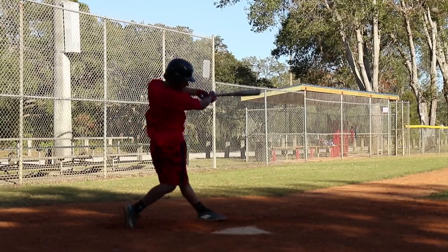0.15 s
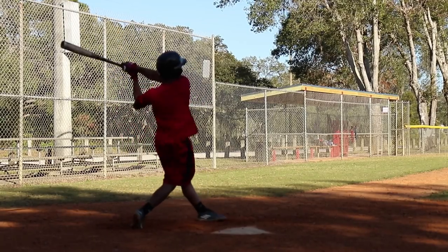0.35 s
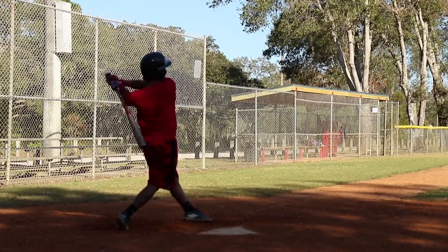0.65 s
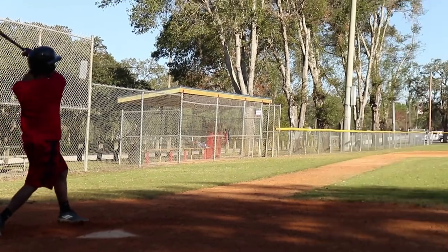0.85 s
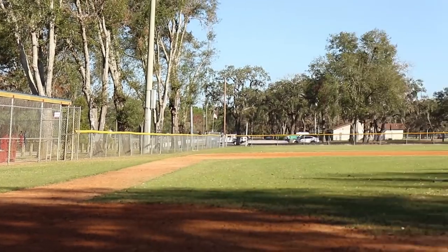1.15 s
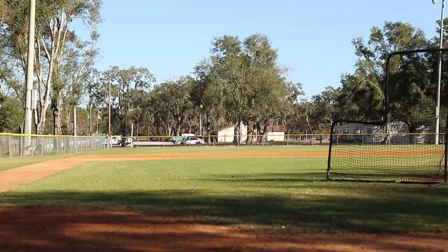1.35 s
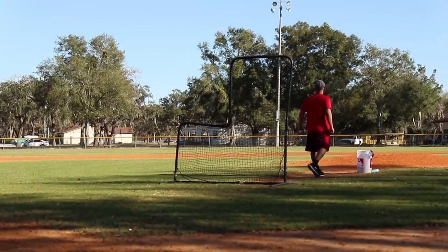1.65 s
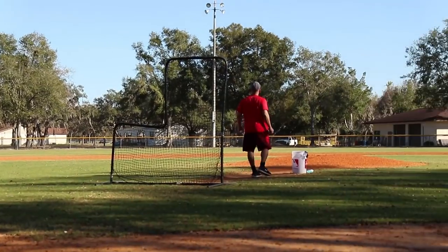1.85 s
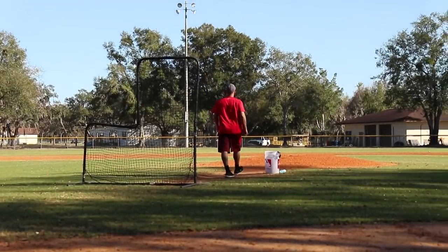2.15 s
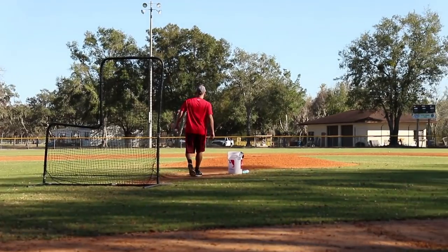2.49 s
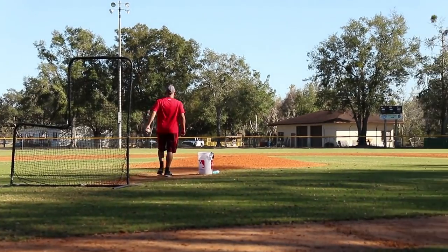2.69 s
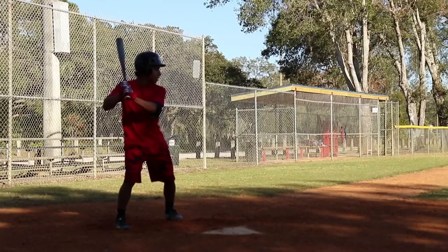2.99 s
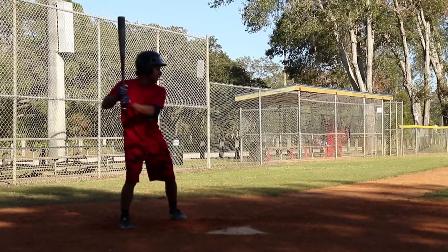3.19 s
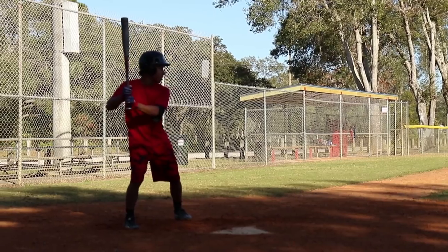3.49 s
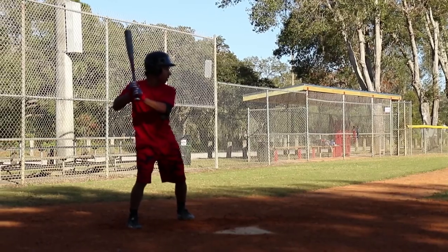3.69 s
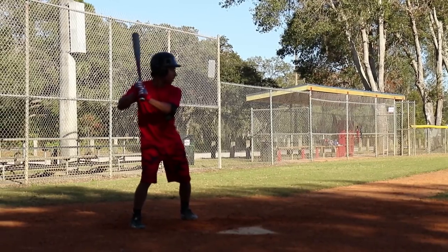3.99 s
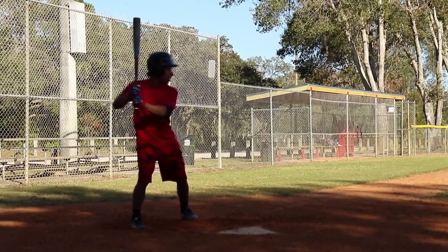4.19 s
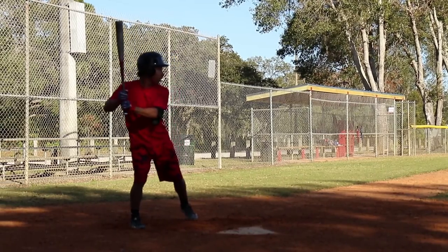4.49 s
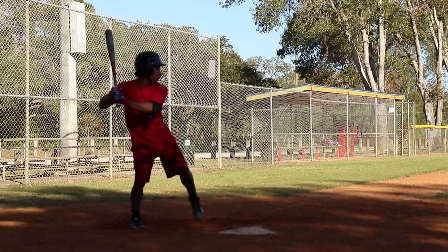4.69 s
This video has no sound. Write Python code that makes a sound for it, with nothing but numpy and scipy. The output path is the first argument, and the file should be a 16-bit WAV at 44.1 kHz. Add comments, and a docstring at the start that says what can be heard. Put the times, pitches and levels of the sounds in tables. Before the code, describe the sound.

A metal bat cracks loudly against a baseball, rings and echoes across an open field, then wind, dirt scuffs and faint crow caws follow.

```python
"""Bat and ball on an open field

A metal bat strikes a ball: an overloading crack of short rings, then the barrel's longer ping, thrown back
by near surfaces and by scattered fences and trees as noisy, dulling echoes.
Wind buffets the microphone as lumpy low noise over a steady bed of far traffic; grains of noise make shoes
on dirt, throbbing harmonics a crow, and short sine glides small birds far away.
The recorder's gain control ducks after the blow and recovers."""
import sys
import numpy as np
from scipy import signal
from scipy.fft import rfft, irfft
from scipy.io import wavfile
from scipy.ndimage import minimum_filter1d

SR = 44100
rng = np.random.default_rng(int(sys.argv[2]) if len(sys.argv) > 2 else 0)


def elevation(decibels):
    """Turn decibel levels (scalar or array-like) into linear amplitude ratios."""
    levels = np.asarray(decibels, float)
    return 10 ** (levels / 20)


def master_out(mix):
    """Clip the mix to full scale and print it as 16-bit PCM to the path in sys.argv[1]."""
    frames = np.transpose(np.atleast_2d(mix))
    ceiling = np.clip(frames, -1, 1)
    pcm = np.round(ceiling * 32767).astype(np.int16)
    wavfile.write(sys.argv[1], SR, pcm)


N = 213664   # samples


def rms_one(x):
    """Scale to unit rms."""
    return x / np.sqrt(np.mean(x ** 2) + 1e-20)


def coloured(spectrum):
    """Noise of rms 1 whose spectrum runs through the given points, straight over log frequency."""
    hz = np.maximum(np.fft.rfftfreq(N, 1 / SR), 1)
    point_hz, point_db = np.transpose(spectrum)
    shape_db = np.interp(np.log(hz), np.log(point_hz), point_db)
    return rms_one(irfft(rfft(rng.standard_normal(N)) * elevation(shape_db), N))


def drift(rate_hz):
    """Slow random wander of rms 1: noise through two equal low-pass poles."""
    r = np.exp(-2 * np.pi * rate_hz / SR)
    settled = signal.lfilter([1], [1, -2 * r, r * r], rng.standard_normal(N + SR))[SR:]
    return rms_one(settled)


def ring(clicks, hz, t60):
    """A unit click sets a decaying sine of starting height 1 ringing."""
    r = elevation(-60 / (t60 * SR))
    w = 2 * np.pi * hz / SR
    return signal.lfilter([0, np.sin(w)], [1, -2 * r * np.cos(w), r * r], clicks + 1e-18)


def resonate(x, peaks):
    """Parallel resonances with alternating signs; rms 1."""
    out = np.zeros(N)
    for k, (hz, width_hz, db) in enumerate(peaks):
        t60 = np.log(1000) / (np.pi * width_hz)
        out += (-1) ** k * elevation(db) * np.sqrt(width_hz) * ring(x, hz, t60)
    return rms_one(out)


def swell_db(peak_s, rise_s, fall_s, db):
    """A level that climbs to its peak and sinks again, 20 dB over rise_s and over fall_s."""
    t = np.arange(N) / SR - peak_s
    return db - 20 * np.maximum(-t / rise_s, t / fall_s)


def power_sum(levels_db):
    """Height of unrelated sounds heard together."""
    return np.sqrt(sum(elevation(db) ** 2 for db in levels_db))


# Spectrum of far traffic and the hiss of air and microphone: f/Hz, relative level/dB
FIELD_SPECTRUM = [(180, -35), (300, -3), (391, -15), (546, -11), (712, -12.5), (774, -11.5), (870, -12),
                  (961, -11), (1810, -17), (2130, -22), (3290, -25), (4820, -30), (11500, -30),
                  (16000, -37.5)]


def field():
    """Far traffic, air and microphone hiss: one coloured noise whose level wanders slightly."""
    return elevation(-54 + 0.38 * drift(2.8)) * coloured(FIELD_SPECTRUM)


# Buffeting at the microphone: t/s, level/dB
WIND_LEVEL = [(0.0, -47), (0.045, -37), (0.13, -35), (0.46, -39.5), (0.644, -43), (0.75, -37),
              (0.845, -30.5), (0.89, -39.5), (0.986, -45), (1.1, -45), (1.2, -44.5), (1.66, -42),
              (2.08, -44), (2.88, -40), (2.99, -44), (3.03, -48), (4.0, -47), (4.6, -49), (4.84, -49)]
# Low noise at the microphone, early and late: f/Hz, relative level/dB
EARLY_WIND_SPECTRUM = [(15, -54), (25, -13.5), (75, -1.5), (107, 1.5), (141, 0), (188, -1.5), (264, -6),
                       (352, -24), (500, -30), (650, -55), (1100, -120)]
LATE_WIND_SPECTRUM = [(15, -41), (25, -16), (59, -5.5), (114, 1), (172, -7), (242, -7), (264, -16),
                      (425, -30), (500, -45), (650, -46), (1100, -120)]
# Slow swells of the deep rumble: peak t/s, rise/s and fall/s (20 dB each), level/dB
RUMBLE_SWELLS = [(0.0, .01, 0.11, -33), (.47, 0.36, 0.26, -37.5), (.9, .5, 0.35, -37.5),
                 (1.25, .2, 0.57, -50), (3.99, 0.9, 0.21, -46), (4.74, 0.21, .4, -45)]


def wind():
    """Lumpy low noise: buffeting follows the wind, deep rumble follows it too and has slow swells of its own."""
    late_from_s, deep_under_db = 3.0, 13   # the late spectrum replaces the early one at once
    t = np.arange(N) / SR
    rumble = np.where(t > late_from_s, coloured(LATE_WIND_SPECTRUM), coloured(EARLY_WIND_SPECTRUM))
    below_90 = signal.butter(2, 90, "low", fs=SR, output="sos")
    above_90 = signal.butter(2, 90, "high", fs=SR, output="sos")
    deep = rms_one(signal.sosfiltfilt(below_90, rumble))
    buffet = rms_one(signal.sosfiltfilt(above_90, rumble))
    point_s, point_db = np.transpose(WIND_LEVEL)
    wind_db = np.interp(t, point_s, point_db)
    deep_height = power_sum([wind_db - deep_under_db] + [swell_db(*swell) for swell in RUMBLE_SWELLS])
    low = buffet * elevation(wind_db + 1.0 * drift(19.0))
    low += deep * deep_height * elevation(1.33 * drift(9.3))
    # strong gusts bend the diaphragm unevenly
    pop_band = signal.butter(2, [260, 520], "band", fs=SR, output="sos")
    pops = signal.sosfilt(pop_band, low * np.abs(low))
    return low + elevation(22.5) * pops


# Small birds far away: start t/s, length/s, start f/Hz, end f/Hz, peak level/dB
BIRD_CHIRPS = [(.485, .03, 9000, 6960, -66), (1.617, 0.027, 10880, 13300, -58),
               (1.768, .035, 6400, 6130, -65), (1.912, 0.015, 12600, 10900, -59),
               (2.283, .009, 11500, 14800, -55), (2.878, .012, 11000, 10000, -61)]


def birds():
    """Quick whistled glides, each a sine sliding in pitch, with a close echo."""
    out = np.zeros(N)
    for s, length_s, start_hz, end_hz, db in BIRD_CHIRPS:
        hz = np.linspace(start_hz, end_hz, round(length_s * SR))
        whistle = np.sin(2 * np.pi * np.cumsum(hz) / SR)
        at = round(s * SR)
        out[at:at + len(hz)] += elevation(db) * np.sqrt(np.hanning(len(hz))) * whistle
    return out + elevation(-8) * np.roll(out, round(.009 * SR))


# Crow calls: start t/s, length/s, top f/Hz of the strong second harmonic, level/dB before the harmonics' own
CROW_CALLS = [(2.11, 0.18, 1500, -60), (2.477, 0.18, 1515, -61.5), (3.27, .165, 1545, -56),
              (3.652, 0.18, 1545, -55.5), (3.769, .095, 1780, -58.5)]
# Harmonics of a call: multiple of the fundamental, relative level/dB
CROW_HARMONICS = [(1, -17), (2, 0.5), (3, -13), (4, -18)]


def crow(rough_db, waver):
    """Arched harmonic calls, throbbing with the rasp of the throat, and a faint echo."""
    top_at, start_pitch, end_pitch = .31, 0.74, .76   # share of the length; shares of the top pitch
    edge_s, sink_db = 0.033, 5   # fade at both ends; each call starts this much louder than it ends
    throat_hz, throat_width_hz, throat_db = 1302, 166, 7   # lifts the harmonic that passes through it
    out, t = np.zeros(N), np.arange(N) / SR
    for s, length_s, top_hz, db in CROW_CALLS:
        gone = np.clip((t - s) / length_s, 0, 1)
        rising = np.maximum(1 - gone / top_at, 0) ** 2
        sagging = np.maximum((gone - top_at) / (1 - top_at), 0) ** 1.5
        hz = top_hz * (1 - (1 - start_pitch) * rising - (1 - end_pitch) * sagging)
        # pi, not 2 pi: the fundamental lies at half of hz
        phase = np.pi * np.cumsum(hz * (1 + waver * drift(56.6))) / SR
        stack = np.zeros(N)
        for k, level_db in CROW_HARMONICS:
            lift_db = throat_db * np.exp(-((k * hz / 2 - throat_hz) / throat_width_hz) ** 2)
            stack += elevation(level_db + lift_db) * np.sin(k * phase)
        edges = np.clip(np.minimum(t - s, s + length_s - t) / edge_s, 0, 1)
        call_db = db + sink_db * (1 - gone) + rough_db * drift(90.4)
        out += np.sqrt(2) * stack * edges * elevation(call_db)
    return out + elevation(-16) * np.roll(out, round(.045 * SR))


# Small knocks and clinks nearby: t/s, main ring level/dB, main f/Hz, second f/Hz, t60/s
SMALL_KNOCKS = [(2.464, -41, 1090, 691, 0.078), (2.505, -46.5, 3330, 4520, .011),
                (2.953, -52.5, 1820, 3440, .17), (3.309, -41.5, 2530, 1785, .07),
                (3.312, -52, 3000, 3150, .12)]


def small_knocks():
    """Each knock sets two rings going, the second 5.5 dB weaker."""
    out = np.zeros(N)
    for s, db, main_hz, second_hz, t60 in SMALL_KNOCKS:
        click = np.zeros(N)
        click[round(s * SR)] = elevation(db)
        out += ring(click, main_hz, t60) + elevation(-5.5) * ring(click, second_hz, t60)
    return out


# Grit ticks as a shoe settles: t/s, level/dB before the modes' own
GRIT_TICKS = [(.987, -47), (1.004, -40), (1.019, -42), (3.322, -56), (3.363, -43), (3.374, -44),
              (3.41, -49), (3.444, -44.5), (3.522, -53), (4.47, -55.5)]
# What every tick rings with: f/Hz, relative level/dB, t60/s
GRIT_TICK_MODES = [(1500, 2, 0.011), (3200, -4, 0.011), (3900, -6, .008), (4900, -7, 0.011),
                   (5960, -5, .006), (7100, -11, .005), (8800, -13, .004)]


def grit_ticks():
    """Every tick strikes the same short modes."""
    ticks = np.zeros(N)
    for s, db in GRIT_TICKS:
        ticks[round(s * SR)] = elevation(db)
    return sum(elevation(db) * ring(ticks, hz, t60) for hz, db, t60 in GRIT_TICK_MODES)


# Resonances of the rubbing sole: f/Hz, width f/Hz, relative level/dB in each of two passes
SOLE_RESONANCES = [(925, 250, -3), (2180, 180, -1), (2820, 160, -2.5), (3220, 160, -3), (4170, 200, -3.5),
                   (5280, 200, -6.5), (6220, 220, -6.5), (7500, 350, -7)]


def sole_squeak(grains, grit):
    """A sole rubs as the batter twists: rubbing noise rings twice through the sole, then fades."""
    hold_s, fade_s, level_db = .056, 0.041, -45.5   # the fade spans 20 dB
    rubbed = resonate(grains, SOLE_RESONANCES) + .3 * grit
    steady_then_fade_db = swell_db(hold_s, 1e3, fade_s, level_db)
    return elevation(steady_then_fade_db) * resonate(rubbed, SOLE_RESONANCES)


# Shoes on dirt: peak t/s, rise/s and fall/s (20 dB each), grit level/dB, dullness 0-1 (adds dirt)
SHOE_SCUFFS = [(0.132, 0.18, 0.036, -54.5, 1), (.736, .14, 0.18, -48.5, 0.34), (1.02, 0.11, .05, -48, 0.99),
               (2.98, .2, .1, -66, 0.53), (3.325, .035, .5, -53, 0.46), (4.47, .03, 0.046, -64, .5),
               (4.545, .14, 0.039, -61.5, 0.47)]
# Resonances of bright grit and of duller dirt: f/Hz, width f/Hz, relative level/dB
GRIT_RESONANCES = [(2550, 2100, 1.5), (4150, 2700, -2), (5418, 900, -6.5), (6700, 1200, -10),
                   (9000, 4200, -14)]
DIRT_RESONANCES = [(900, 600, 0.5), (1599, 1100, 3), (2210, 790, -12.5)]


def shoes():
    """Dense uneven grains ring in grit and in duller dirt, and feed the rubbing sole."""
    struck = rng.random(N) < 3000 / SR   # about 3000 grains per second
    grain_db = 4.0 * np.minimum(rng.exponential(1, N), 4)
    grains = struck * elevation(grain_db) * rng.choice([-1, 1], N)
    grit = resonate(grains, GRIT_RESONANCES)
    dirt = resonate(grains, DIRT_RESONANCES)
    out = sole_squeak(grains, grit)
    for peak_s, rise_s, fall_s, db, dull in SHOE_SCUFFS:
        scuff_db = swell_db(peak_s, rise_s, fall_s, db) + 1.3 * drift(40)
        out += elevation(scuff_db) * (grit + 2 * np.clip(dull, 0, 1) * dirt)
    return out


# Echo clouds off fences and trees: arrival t/s after the blow, hold/s, relative level/dB, t60/s
SCATTERED_ECHOES = [(0.0038, .002, -10.5, .04), (.024, 0.0089, -15, 0.11), (.04, 0.11, -26, 0.3),
                    (.02, 0.22, -51.5, 2.15)]


def echo_height():
    """Scattered echoes build up quickly, hold and die away, their sum flickering in level."""
    t = np.arange(N) / SR
    levels_db = []
    for s, hold_s, db, t60 in SCATTERED_ECHOES:
        decay_db = 60 * np.maximum(t - s - hold_s, 0) / t60
        levels_db.append(swell_db(s, 0.019, 1002.0, db) - decay_db)
    return power_sum(levels_db) * elevation(2.0 * drift(25))


# Near reflections of the ping: delay t/s, level/dB against the direct sound
NEAR_REFLECTIONS = [(0.0104, 6), (.04, -3.5), (0.116, -14), (.16, -16), (0.207, -29)]


def echo_paths(echoes):
    """The ping's paths to the microphone: direct, near reflections and a haze of random taps."""
    paths = np.zeros(N)
    paths[0] = 1
    for delay_s, db in NEAR_REFLECTIONS:
        paths[round(delay_s * SR)] = elevation(db)
    return paths + elevation(-26) * echoes * rng.standard_normal(N)


# The crack as it returns from all round: f/Hz, relative level/dB
WASH_SPECTRUM = [(260, -58.5), (450, -25.5), (691, -14.5), (1020, -13.5), (1410, -6.5), (2330, -15),
                 (3040, -8.5), (3530, -20.5), (10700, -40), (15500, -52.5)]


def crack_wash(echoes):
    """The returning crack as coloured noise; air takes the treble off the far, later paths."""
    t = np.arange(N) / SR
    wash = elevation(9.5) * echoes * coloured(WASH_SPECTRUM)
    bright = signal.sosfilt(signal.butter(2, 4000, "high", fs=SR, output="sos"), wash)
    return wash - bright * (1 - elevation(5.5 - 38 * t))


# Narrow tones in the far echoes: f/Hz, width f/Hz, relative level/dB in each of two passes
LINGERING_TONES = [(1340, 50, 1), (1450, 55, 0.5), (2510, 32, -2), (2730, 25, -3.5), (3015, 26, -0.5),
                   (3310, 30, 1.5)]


def lingering_echoes():
    """Noise narrowed twice by the same resonances lingers in the far echoes."""
    rise_s, t60, level_db = 0.16, 1.46, -35   # the rise spans 20 dB and ends at the peak
    tones = resonate(resonate(rng.standard_normal(N), LINGERING_TONES), LINGERING_TONES)
    return tones * elevation(swell_db(rise_s, rise_s, t60 / 3, level_db))


# Short knock of ball on barrel: f/Hz, level/dB against the blow, t60/s
BALL_KNOCK = [(670, -14.5, 0.024), (1102, -5.5, 0.016), (1233, 1.5, 0.017), (1505, -6, .02),
              (2260, -5.5, 0.014), (2836, -4.5, 0.014), (3650, -8.5, 0.012), (5650, -16, .008),
              (6945, -21, 0.0068), (10000, -20, .005)]
# Ringing barrel: f/Hz, level/dB against the blow, t60/s
BARREL_MODES = [(1350, -24, .1), (2490, -18.5, .15), (2526, -16.5, .1), (2980, -9.5, 0.09),
                (3013, -20.5, .1), (3262, -29, 0.18), (3770, -29.5, .05), (5630, -38, 0.083),
                (7460, -33.5, 0.14)]


def bat():
    """One click rings the knock and the barrel; near surfaces and a dulling haze of echoes answer."""
    hit_s, hit_db = .1469, 14
    t, click = np.arange(N) / SR, np.zeros(N)
    click[0] = elevation(hit_db)
    knock = sum(elevation(db) * ring(click, hz, t60) for hz, db, t60 in BALL_KNOCK)
    # the swinging barrel turns each mode towards and away from the listener
    ping = sum(elevation(db + 3.0 * drift(10)) * ring(click, hz, t60) for hz, db, t60 in BARREL_MODES)
    ping *= 1 - np.exp(-t / 0.0057)   # soft onset
    echoes = echo_height()
    heard = knock + signal.fftconvolve(ping, echo_paths(echoes))[:N]
    heard += crack_wash(echoes) + lingering_echoes()
    start = round(hit_s * SR)
    return np.concatenate([np.zeros(start), heard[:N - start]])


def scene():
    """Everything the microphone hears, as one channel."""
    background = field() + wind() + birds() + crow(rough_db=4.2, waver=.025)
    nearby = small_knocks() + grit_ticks() + shoes()
    return (background + nearby + bat())[None]


def gain_control(x, threshold_db, hold_s, release_db_s, attack_s):
    """Peaks over the threshold pull the gain down; it holds, then climbs back."""
    over_db = np.maximum(20 * np.log10(np.abs(x) + 1e-9) - threshold_db, 0)
    size = round(hold_s * SR)
    # the origin makes the window look back only
    held = -minimum_filter1d(-over_db, size=size, origin=(size - 1) // 2)
    climb = release_db_s * np.arange(N) / SR
    cut_db = np.maximum.accumulate(held + climb) - climb
    r = np.exp(-1 / (attack_s * SR))
    return elevation(-signal.lfilter([1 - r], [1, -r], cut_db))


def top_cut(x):
    """Nothing passes above the cut-off."""
    return signal.sosfilt(signal.butter(12, 16120, fs=SR, output="sos"), x)


def record(dry):
    """The gain control ducks the microphone's signal, and what still overloads is clipped."""
    sensed = np.clip(dry[0], -2.5, 2.5)   # the control's own view of the level saturates
    gain = gain_control(sensed, threshold_db=-10.5, hold_s=0.12, release_db_s=131, attack_s=.006)
    mix = np.clip(dry * gain, -1, 1)
    return top_cut(mix)


dry = scene()
out = record(dry)
master_out(out)
```